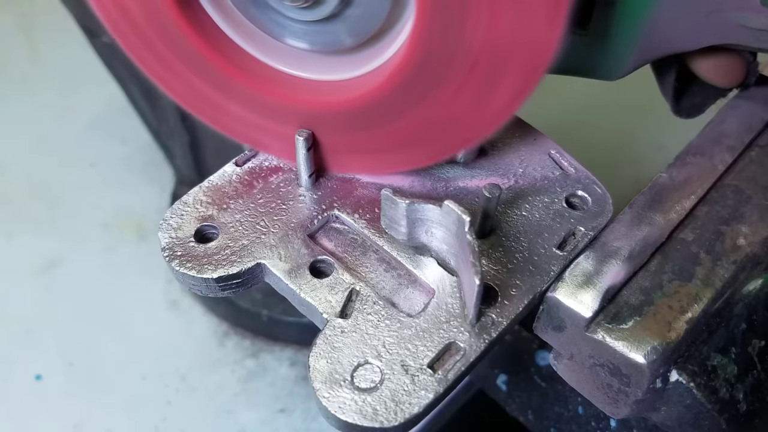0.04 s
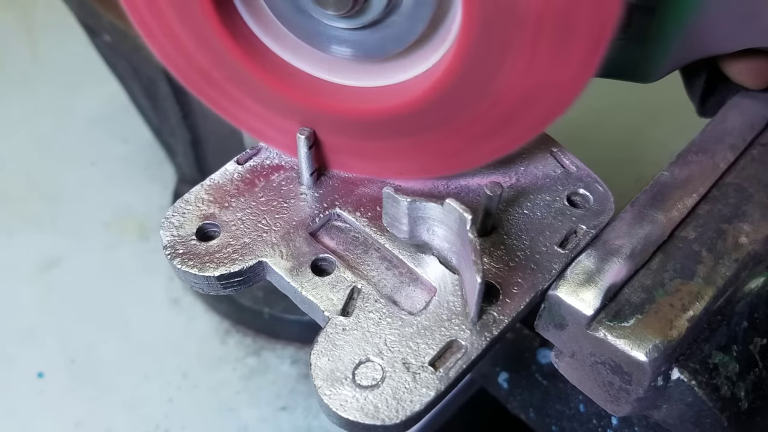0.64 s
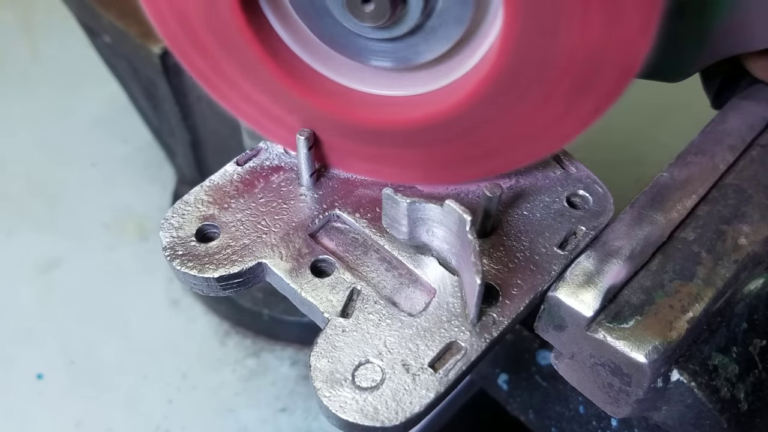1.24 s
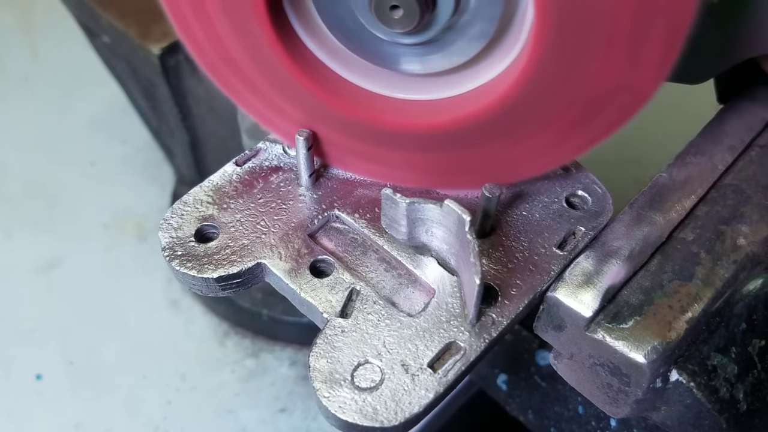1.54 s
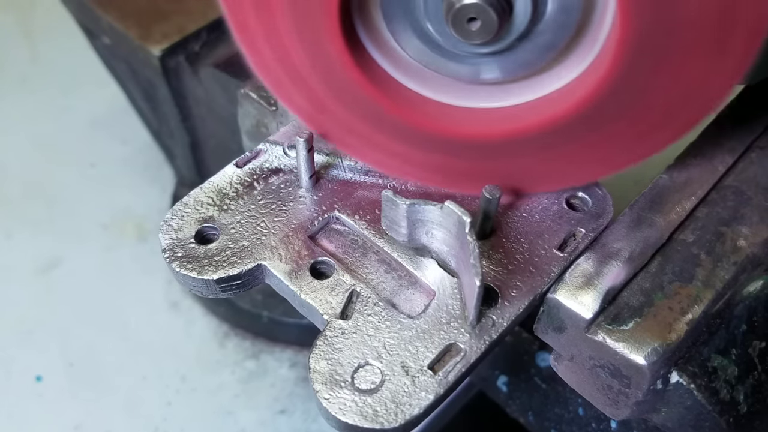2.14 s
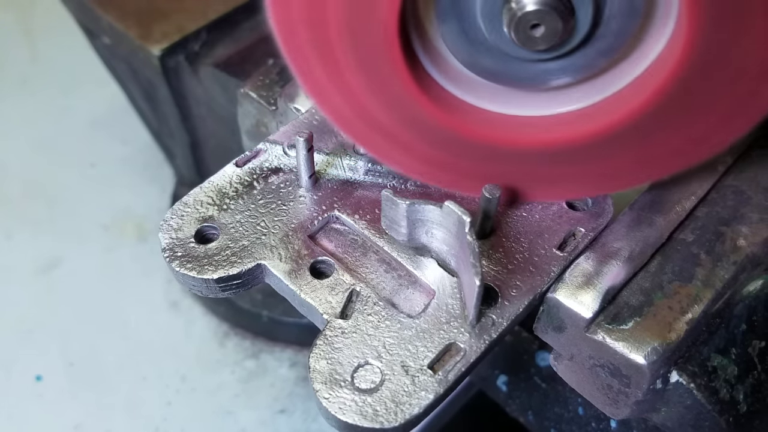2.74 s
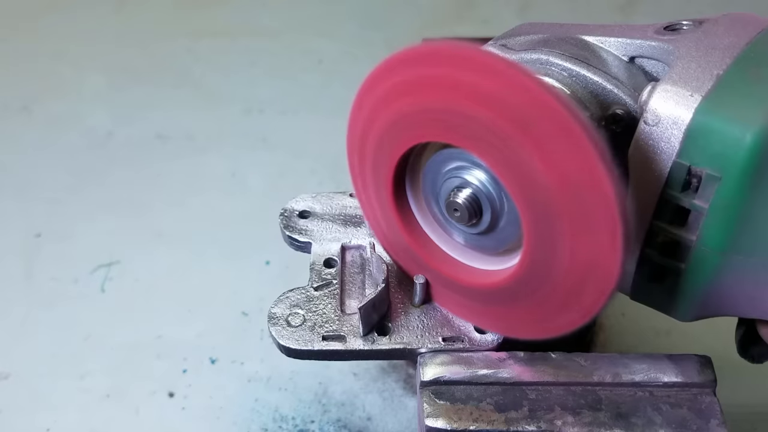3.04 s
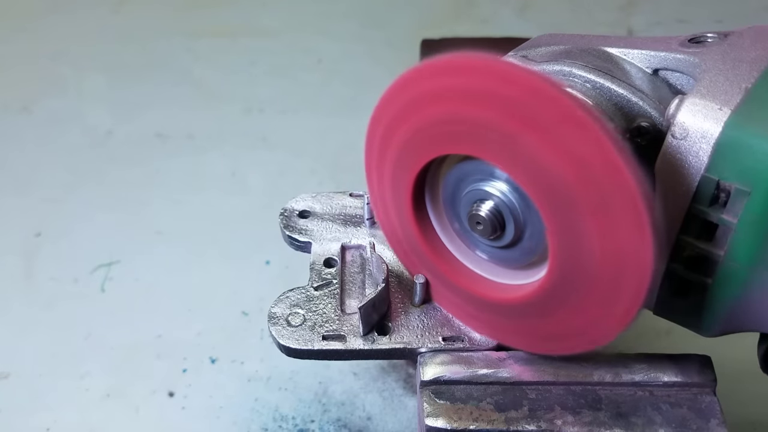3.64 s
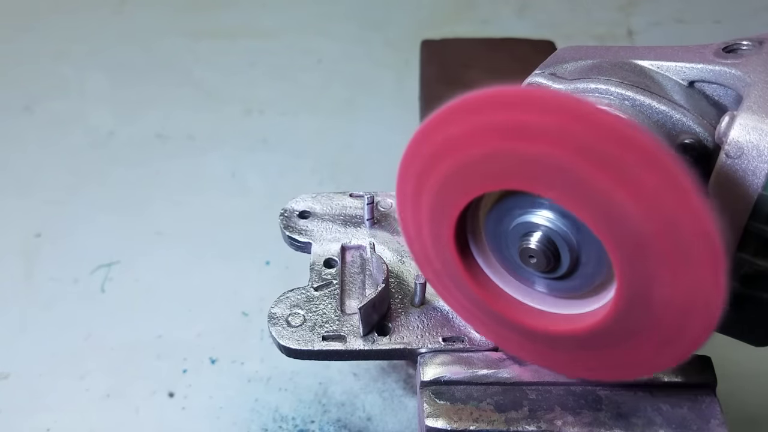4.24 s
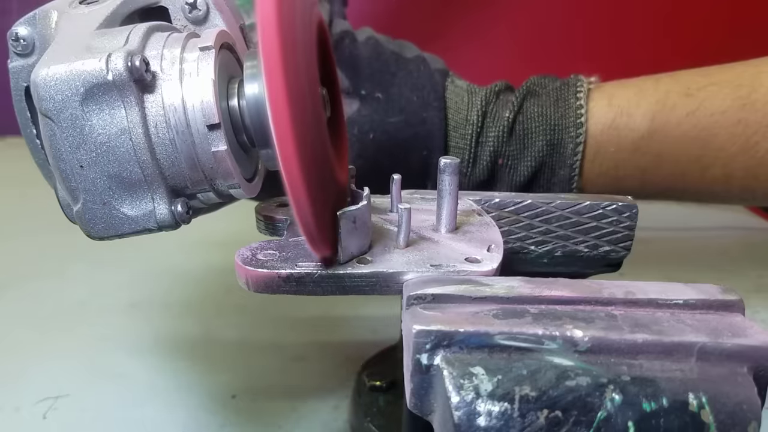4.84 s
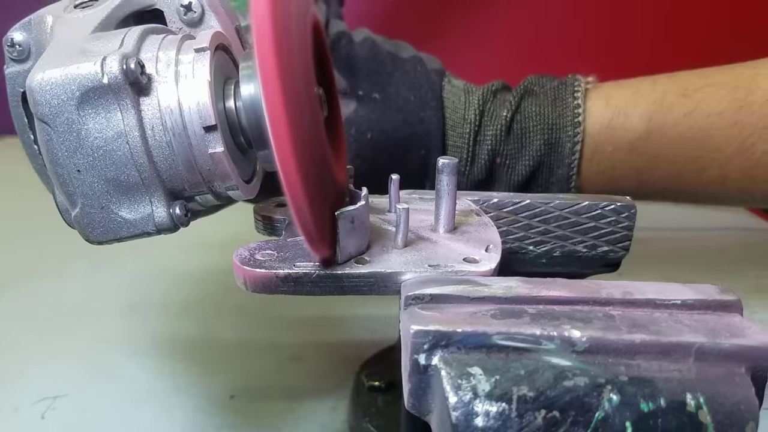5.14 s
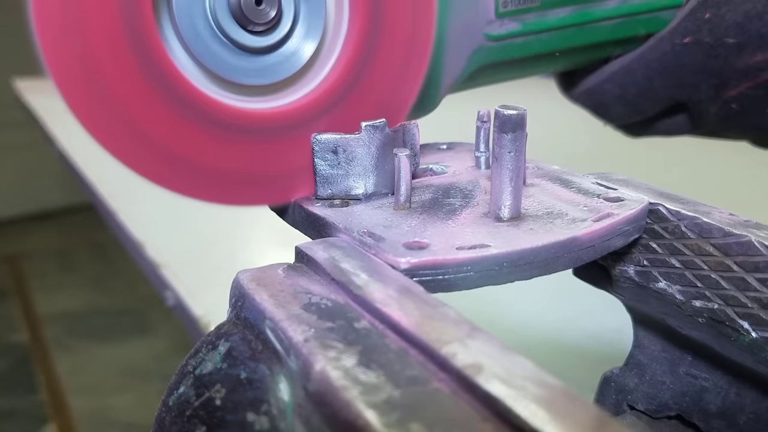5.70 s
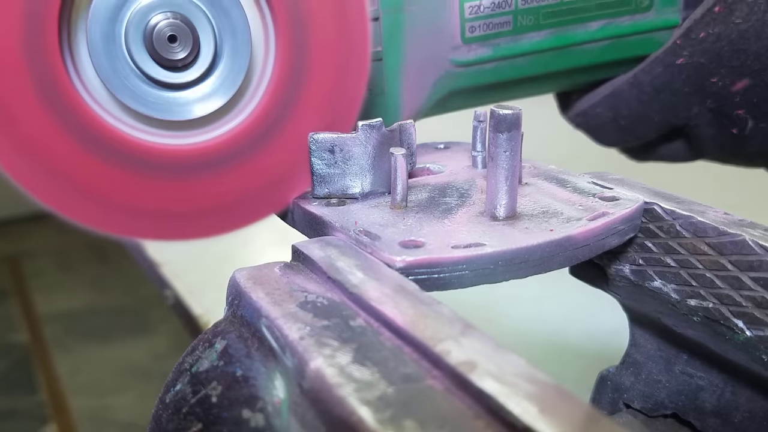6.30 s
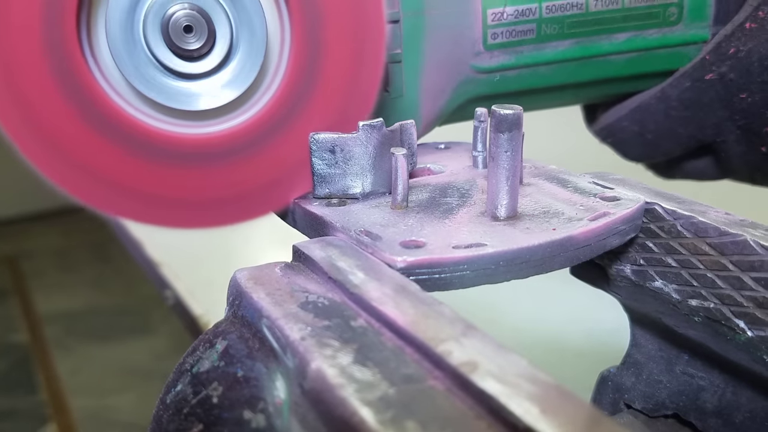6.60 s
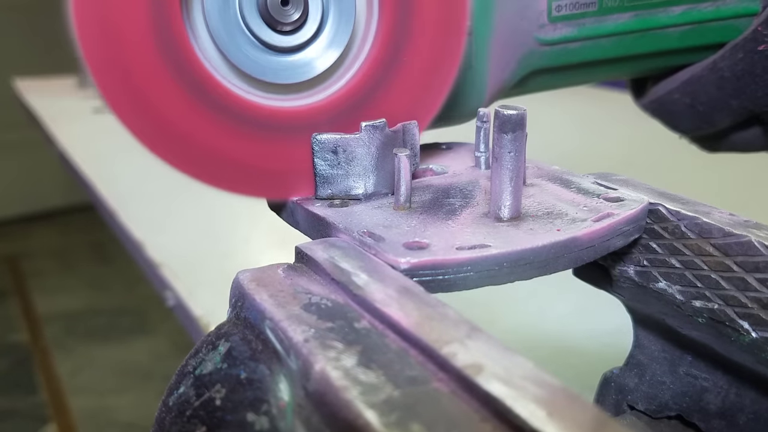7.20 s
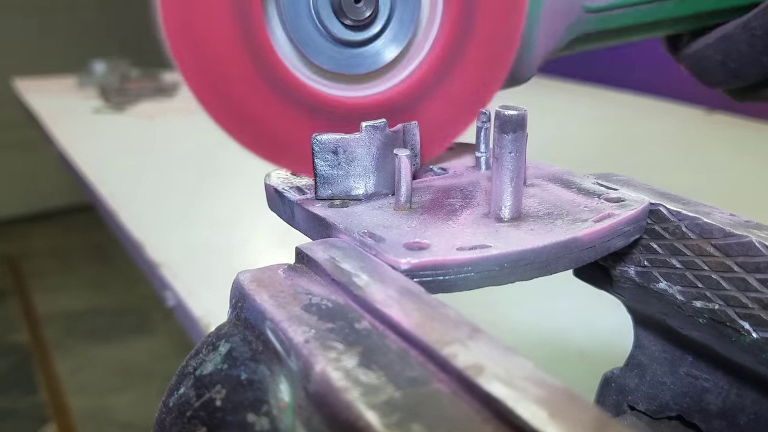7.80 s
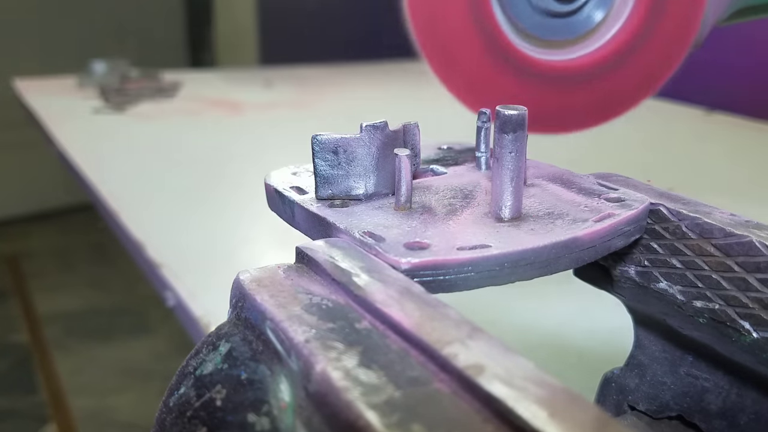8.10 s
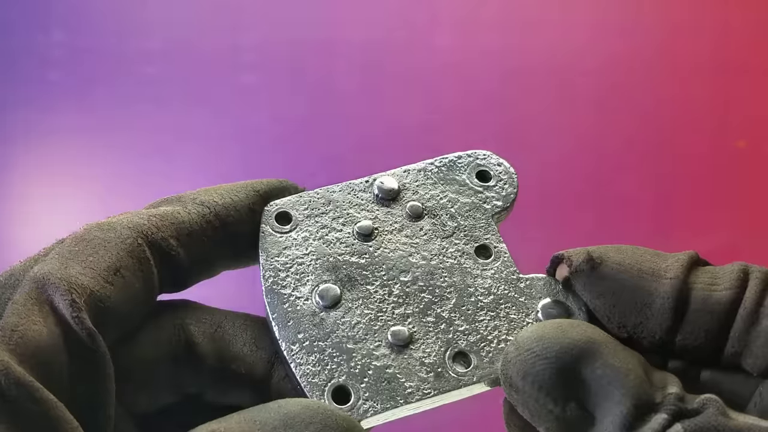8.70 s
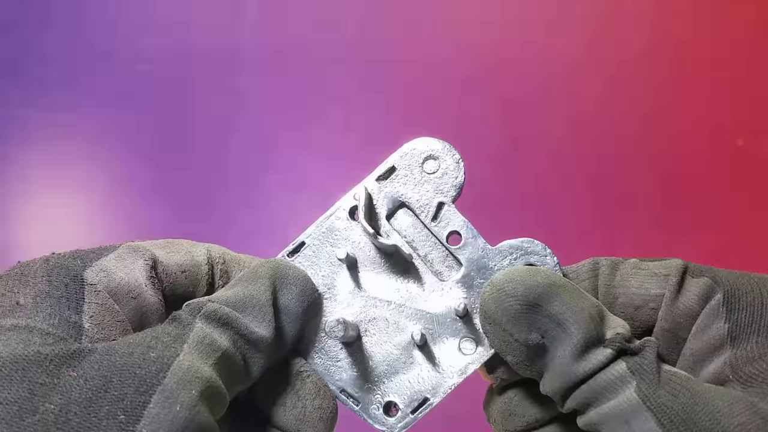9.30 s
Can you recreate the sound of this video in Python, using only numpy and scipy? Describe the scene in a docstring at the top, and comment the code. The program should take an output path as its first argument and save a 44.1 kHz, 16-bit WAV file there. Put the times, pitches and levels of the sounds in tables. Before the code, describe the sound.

Close to a workbench, a polishing wheel on an angle grinder hisses continuously against steel, its motor whining underneath. The tone shifts abruptly a few times, and the wheel's draught rumbles on the microphone. In the second half, high whistles and singing metal notes come through as the motor slows slightly. After one harsher rasp the sound fades to silence, then a soft, dull rush starts at the very end.

```python
"""An angle grinder drives a felt wheel over a steel plate in a vice, heard close from four places in turn. From
the start the wheel rubs with the same texture every turn and rings the plate, while rotor, gears and spindle
hum, slowing under load, and the wheel's draught buffets the microphones. After five seconds the rub squeals and
the plate sings. Near eight a last hard pass rasps and the wheel lifts off, the rub dying away; then the whole
sound fades to silence, and out of the silence a dull rush starts at the very end."""
import sys
import numpy as np
from scipy import signal
from scipy.fft import rfft, irfft, next_fast_len
from scipy.io import wavfile
from scipy.ndimage import uniform_filter1d, map_coordinates

SR = 44100
rng = np.random.default_rng(int(sys.argv[2]) if len(sys.argv) > 2 else 0)


def unload_wav(signal):
    """Save mono or channel-first audio to the path in sys.argv[1] as 16-bit WAV at rate SR, clipped to [-1, 1]."""
    wavfile.write(
        sys.argv[1],
        SR,
        np.round(np.clip(np.atleast_2d(signal).T, -1, 1) * 32767).astype(np.int16),
    )


N = 412335
TIME = np.arange(N) / SR
GEAR = 13 / 48  # pinion teeth over crown teeth
FADE_S, SILENT_S = 8.52, 8.68  # everything fades to silence between these times
# Tone of the hiss from above, in front, side on, low by the vice, and in the hard pass.
# Each row: frequency in Hz, left gain in dB, right gain in dB.
ABOVE = [(298, -91, -86.5), (529, -85, -82), (760, -86, -79), (1210, -74.5, -74), (1460, -76.5, -76.5),
         (1764, -76.5, -72.5), (2320, -78.5, -75.5), (2540, -77, -73), (4080, -76.5, -74), (5730, -84, -78),
         (7860, -83, -80), (9100, -91.5, -93.5), (12900, -85, -88), (15500, -86.5, -83.5)]
FRONT = [(300, -89, -91), (420, -89, -85.5), (1050, -83.5, -80), (1320, -78, -77), (2400, -83.5, -78.5),
         (2530, -79, -76), (4100, -80.5, -78), (4540, -83.5, -77.5), (5800, -83, -81.5), (7300, -88.5, -79),
         (8200, -81, -82.5), (9430, -101.5, -99), (9930, -87, -92.5), (15500, -84, -84)]
SIDE_ON = [(300, -89.5, -91.5), (600, -84, -85), (766, -85, -84.5), (875, -80.5, -81.5), (2070, -80.5, -78),
           (2530, -74.5, -79.5), (2780, -76.5, -77.5), (6100, -80.5, -80), (7100, -87, -80.5),
           (8000, -81, -83.5), (9450, -88, -99.1), (10600, -81, -98.6), (10750, -81.5, -95),
           (15500, -83.5, -90)]
LOW = [(299, -89.5, -88.5), (503, -86.5, -83.5), (600, -84.5, -83), (810, -85.5, -80.5), (1160, -76.5, -78),
       (1430, -77.5, -74.5), (2190, -77, -76), (2940, -76, -77.5), (4100, -77.5, -74.5), (6800, -82, -81.5),
       (8550, -82.5, -81), (9450, -86, -96.5), (11600, -82.5, -90.5), (15500, -83.5, -84)]
RASP = [(296, -85, -82.5), (600, -76.5, -71.5), (776, -81, -74.5), (1205, -74.5, -73), (1650, -77, -70),
        (2070, -70, -71.5), (2393, -73, -69), (2960, -72.5, -70), (3770, -72, -67), (4100, -69.5, -69),
        (7720, -78.5, -72.5), (9450, -82, -87), (12570, -78.5, -79.5), (15400, -79, -78)]


def felt_rim(turns, memory=0.92, points=256):
    """Felt on steel along three sound paths: the rim's texture comes round every turn and slowly wears."""
    fresh = rng.standard_normal((3, 1700, points))  # path, turn, point on the rim
    worn = signal.lfilter([1], [1, -memory], fresh, axis=1)
    paths = worn[:, 40:].reshape(3, -1)  # start once the texture has built up
    return unit(np.array([map_coordinates(path, [turns * points], order=3) for path in paths]))


def friction(turns, load, band_hz=(6800, 13300), off_band_repeat=0.13, wobble=0.05, flutter_db=0.6):
    """The repeating rub, clearest in one treble band and under load, mixed with fresh air noise."""
    rub, air = felt_rim(turns), rng.standard_normal((3, N))
    blend = lambda share: np.sqrt(share) * rub + np.sqrt(1 - share) * air
    repeating = np.zeros(N)
    for part, _, _, repeat, *_ in perspectives():
        repeating[part] = repeat * np.sqrt(load[part])
    body = blend(repeating * off_band_repeat)
    sizzle = highpass(blend(repeating) - body, band_hz[0])
    felt = body + sizzle - highpass(sizzle, band_hz[1])
    throb = 1 + wobble * np.sin(2 * np.pi * turns)  # the out-of-round wheel presses harder once a turn
    return felt * throb * undb(flutter_db * walk(35))


def perspectives():
    """Where the rub is heard from: each stretch's slice of samples, followed by its settings."""
    # Each row: start in seconds, left microphone's lag in ms, direct share, share that repeats at full
    # load, treble in dB, left minus right in dB, its drift in dB per second, tone.
    views = [(0, -0.013, 0.45, 0.31, 2.5, 2, -0.3, ABOVE), (3.0, 0.048, 0.38, 0.5, -0.5, -0.8, 0.9, FRONT),
             (4.57, -0.18, 0.56, 0.37, 2, -0.5, -1, SIDE_ON), (5.265, -0.11, 0.39, 0.5, 1.7, 0, 0.16, LOW),
             (7.829, 0.061, 0.25, 0, 1.3, 2, -9, RASP)]
    ends = [row[0] for row in views[1:]] + [SILENT_S]
    return [(span(start, end), *settings) for (start, *settings), end in zip(views, ends)]


def hiss(rub, diffuse_hz=6000, echo_s=0.001103, bend_rad=0.43, brighten=0.2, trim_db=-0.63):
    """The rub reaches the microphones directly and scattered; a lighter touch is quieter and brighter."""
    # How hard the wheel rubs. Each row: time in seconds, pressure in dB.
    pressure = [(0, 0.1), (1.0, 1.5), (2.1, -1.3), (2.98, -2.5), (3.02, 1), (4.15, 0.5), (4.65, -0.7),
                (5.45, 2.5), (6.05, 1), (6.6, 1.5), (6.95, -0.1), (7.5, 1.55), (7.81, 0.7), (7.835, -1.5),
                (8.14, -3), (8.24, 1.6)]
    pressure_db = curve(pressure) - 0.1 * walk(9.1) + lift_db()  # the hand is slightly unsteady
    out = np.zeros((2, N))
    for part, lag_ms, direct, _, treble_db, first_pan_db, drift_db_per_s, tone in perspectives():
        share = lambda hz: direct / (1 + (hz / diffuse_hz) ** 2)  # treble arrives mostly scattered
        delay = lambda hz: np.exp(-2j * np.pi * hz * np.array([[lag_ms / 1000], [0]]))
        # the echo off the bench bends the phase between the microphones
        echo = lambda hz: np.exp(1j * bend_rad * np.sin(2 * np.pi * hz * echo_s) * np.array([[1], [0]]))
        straight = shape(rub[0, part], lambda hz: np.sqrt(share(hz)) * delay(hz) * echo(hz))
        scattered = shape(rub[1:, part], lambda hz: np.sqrt(1 - share(hz)))
        pair = highpass(colour(straight + scattered, tone), 210) * np.sqrt(SR / 2)
        treble = undb(treble_db - brighten * pressure_db[part])
        pair += (treble - 1) * highpass(pair, 6900)
        pan_db = first_pan_db + drift_db_per_s * (TIME[part] - TIME[part.start])
        out[:, part] = pair * undb(trim_db + pressure_db[part] + np.array([pan_db, -pan_db]) / 2)
    return out


def lift_db(lift_s=8.179, db_per_s=35.5):
    """The rubbing dies away once the wheel comes off the plate."""
    return -db_per_s * np.maximum(TIME - lift_s, 0)


def plate_rings(rub):
    """Each resonance of the plate swells and glides as the wheel crosses the spot that wakes it."""
    # Each row: start, end and ramp in seconds, pitch midway in Hz, glide in Hz per second,
    # width in Hz, level in dB.
    resonances = [(0, 2.95, .1, 1220, -31.5, 200, -79), (0, 1.9, .15, 2870, 0, 200, -66),
                  (1.85, 2.95, .3, 4030, 0, 700, -57), (3.0, 4.55, .1, 3280, 0, 140, -73),
                  (4.57, 5.26, 0.055, 1114, 0.5, 70, -70), (4.57, 5.26, .05, 1660, 2, 95.4, -71),
                  (4.57, 5.26, .05, 3480, 0, 180, -63), (4.52, 4.95, .12, 13660, -1200, 500, -55),
                  (5.25, 5.65, .12, 7670, -300, 220, -59), (5.27, 6.9, 0.13, 1127, 0.5, 149, -66),
                  (5.27, 6.9, 0.14, 4370, 0, 500, -75), (5.25, 5.7, .1, 13550, -200, 600, -58),
                  (5.45, 6.1, .25, 14350, -300, 1500, -50), (5.9, 6.95, .2, 11600, 699, 1900, -56),
                  (6.3, 6.9, .15, 1610, 0, 70, -67), (7.0, 7.7, .15, 1490, 0, 160, -65),
                  (7.0, 7.8, .1, 3700, 0, 1500, -57.5), (7.4, 7.65, .1, 7990, 199, 400, -55),
                  (7.7, 7.83, .03, 7900, 0, 250, -61), (7.82, 8.68, 0.017, 1590, -0.5, 240, -48.5),
                  (7.82, 8.68, 0.017, 1070, 1, 110, -58), (7.82, 8.05, .02, 2820, 0, 260, -48),
                  (7.82, 7.99, .015, 4600, 0, 1600, -49.5), (7.82, 8.02, .015, 1450, -0.5, 900, -54),
                  (7.85, 8.68, .3, 7270, 1.5, 500, -54.5), (7.98, 8.68, 0.089, 2460, -300, 520, -48),
                  (8.0, 8.68, .08, 3300, -300, 750, -51.5), (8.04, 8.15, .03, 3300, 0, 1000, -50)]
    out = np.zeros((2, N))
    for start, end, ramp, centre, glide, width, db in resonances:
        part = span(start, end)
        pitch_hz = centre + glide * (TIME[part] - (start + end) / 2)
        phase = 2 * np.pi * np.cumsum(pitch_hz) / SR
        drive = rub[0, part] + rub[1:, part]
        # a moving band-pass: shift the centre down to zero, smooth, shift it back
        smooth = lambda hz: 1 / (1 + (2 * hz / width) ** 2)
        ring = sum(wave * shape(drive * wave, smooth) for wave in (np.cos(phase), np.sin(phase)))
        right_db = -8 if centre > 9000 else 0  # the left microphone hears the highest rings best
        out[:, part] += unit(ring) * undb([[db], [db + right_db]]) * window(start, end, ramp)[part]
    return out * undb(lift_db())


def cancel_bands(sound, ramp_s=0.093):
    """Scoop out bands that cancel where the microphones stand, each for a while."""
    # Each row: start and end in seconds, centre and width in Hz, depth in dB.
    hollows = [(3.0, 4.6, 4330, 220, 2), (5.195, 7.848, 2340, 300, 3.5), (5.2, 7.8, 4850, 260, 1),
               (5.9, 7.0, 3150, 700, 2), (6.9, 7.85, 5950, 220, 2.5), (6.1, 7.85, 8600, 503, 5),
               (7.8, 8.6, 2170, 259.5, 3)]
    out = sound.copy()
    for start, end, centre, width, depth_db in hollows:
        part = span(start, end)
        band = shape(out[:, part], lambda hz: np.exp(-(2 * (hz - centre) / width) ** 2 / 2))
        out[:, part] -= (1 - undb(-depth_db)) * window(start, end, ramp_s)[part] * band
    return out


def plate_notes(ramp_s=0.16, waver_hz=3, waver_db=1.2):
    """The plate sings a nearly pure, slightly unsteady note where the wheel bears on its edge."""
    # Each row: start and end in seconds, pitch in Hz, level in dB.
    notes = [(6.32, 6.82, 1607, -52.5), (7.08, 7.53, 1471, -53.5)]
    drift_hz, waver = waver_hz * walk(45), undb(waver_db * walk(20))
    out = np.zeros(N)
    for start, end, hz, db in notes:
        phase = 2 * np.pi * np.cumsum(hz + drift_hz) / SR
        out += window(start, end, ramp_s) * undb(db) * np.sin(phase)
    return np.sqrt(2) * waver * out


def squeals(turns, ramp_s=0.049, flicker_db=2.2, slip_turns=0.0011):
    """Thin whistles where a multiple of the wheel's speed meets a resonance; they throb once a turn."""
    # Each row: start and end in seconds, multiple of the wheel's speed, left level in dB,
    # depth of the throb, right minus left in dB.
    whistles = [(5.26, 5.6, 43, -60, .3, 4), (5.36, 5.76, 70, -57, 1.1, -7), (5.43, 5.68, 78, -57, .7, -10),
                (5.56, 5.85, 85, -56, .7, -6), (5.73, 5.98, 82, -56, 1.0, -5),
                (5.76, 6.16, 86, -58, .3, -8), (5.96, 6.24, 67, -53.5, .9, -20),
                (5.97, 6.24, 65, -57.5, .2, -18), (5.96, 6.45, 49, -57, .5, -3),
                (6.04, 6.66, 71, -53.5, 1.3, -17), (6.1, 6.65, 83, -58.5, .7, -10),
                (6.2, 6.75, 87, -59, .9, -10), (6.22, 6.68, 77, -55.5, .6, -13),
                (6.58, 6.95, 72, -58.5, .6, -17), (7.0, 7.32, 48, -56, .3, 0),
                (7.05, 7.26, 66, -56.5, .2, -20), (7.2, 7.44, 49, -60, 1.1, 0),
                (7.32, 7.54, 66, -54.5, .7, -20), (7.39, 7.65, 49, -48.5, 1.0, -2.5),
                (7.42, 7.58, 47, -57.5, .2, 4)]
    flicker = undb(flicker_db * walk(30))
    slipped = turns + slip_turns * walk(70)  # the felt slips back and forth
    out = np.zeros((2, N))
    for start, end, multiple, db, throb, right_db in whistles:
        part = span(start, end)
        cycles = multiple * slipped[part] + rng.random()
        whistle = np.sin(2 * np.pi * (cycles + np.array([[0], [1 / 4]])))  # right is a quarter cycle on
        grip = 1 + throb * np.sin(2 * np.pi * (turns[part] + rng.random()))
        envelope = (window(start, end, ramp_s) * flicker)[part] * grip
        out[:, part] += envelope * undb([[db], [db + right_db]]) * whistle
    return np.sqrt(2) * out


def motor(rotor_turns, jitter_turns=0.054, whine_ramp_s=0.058):
    """Spindle and rotor hum at their own speeds; fan, gears and commutator whine at rotor multiples."""
    # Swells of the two unbalance hums. Each row: start and end in seconds, level in dB.
    spindle_swells = [(0, .6, -66), (4.74, 5.26, -67.5), (6.088, 6.497, -67.5), (7.039, 7.64, -65.5),
                      (7.902, 8.276, -69.5)]
    rotor_swells = [(0.452, .95, -63.5), (4.1, 4.547, -62.5), (5.38, 5.92, -57), (6.28, 6.615, -61),
                    (6.998, 7.703, -63), (7.764, 8.047, -55.5), (8.203, 8.682, -60.5)]
    # Each row: start and end in seconds, multiple of the rotor's speed, level in dB.
    whines = [(0, 5.26, 4, -73), (0, 8.7, 5, -65.5), (0, 8.6, 6, -72.5), (5.27, 8.6, 9, -69.5),
              (7.0, 7.8, 13, -67), (0, 5.26, 24, -72)]
    waver_db = 1.4 * walk(22)
    # the tones reach the two microphones a little out of step
    phase = 2 * np.pi * (rotor_turns + jitter_turns * walk(30) + np.array([[0], [.12]]))
    spindle_gain = swelling(spindle_swells, steady_db=-78) * undb(0.9 * walk(14))
    rotor_gain = swelling(rotor_swells, steady_db=-68.5) * undb([waver_db - 1, waver_db])
    tones = spindle_gain * np.sin(GEAR * phase) + rotor_gain * np.sin(phase)
    for start, end, multiple, db in whines:
        tones += window(start, end, whine_ramp_s) * undb(db + waver_db) * np.sin(multiple * phase)
    return np.sqrt(2) * tones


def draught(eddy_db=2.7, breeze_db=-66.5, strong_db=-38, bright=.55, ramp_s=0.096, trim_db=-1.5):
    """Eddies thump each microphone on its own; a strong draught breaks into smaller, brighter ones."""
    # Tone of the buffeting. Each row: frequency in Hz, gain in dB.
    buffet = [(20, -31.5), (40, -17), (75, 0), (125, 1), (190, -1.5), (280, -9), (400, -14.5), (600, -23.5),
              (1200, -44.5), (4000, -89)]
    # The wheel's air jet sweeps over a microphone. Each row: start and end in seconds,
    # strength midway in dB, growth in dB per second, microphone.
    gusts = [(-.05, 0.66, -59, -15, "left"), (0.635, 1.455, -50.5, -1, "left"),
             (.66, 1.47, -60.5, 16, "right"), (1.48, 2.98, -52.5, -10, "left"),
             (1.5, 3.06, -42.5, 6.5, "right"), (2.973, 3.536, -37.5, -2, "left"),
             (3.462, 4.06, -41.5, -10, "left"), (3.973, 4.29, -41.5, -12, "left"),
             (4.197, 4.616, -49.5, 2, "left"), (4.248, 4.625, -52.5, 15, "right"),
             (5.58, 5.965, -57.5, 5, "right"), (7.78, 8.402, -65, -3, "left"),
             (7.765, 8.503, -57.5, -9, "right")]
    eddies = np.array([rng.standard_normal(N) * undb(eddy_db * walk(140)) for _ in range(2)])
    thumps = colour(eddies, buffet)
    thumps /= np.sqrt(uniform_filter1d(thumps ** 2, int(.1 * SR)))  # even out the level over 0.1 s
    jet = np.zeros((2, N))
    for start, end, db, growth_db_per_s, microphone in gusts:
        gust_db = db + growth_db_per_s * (TIME - (start + end) / 2)
        jet[["left", "right"].index(microphone)] += window(start, end, ramp_s) * undb(gust_db)
    flow = np.hypot(jet, undb(breeze_db))
    small_eddies = bright * flow / undb(strong_db) * highpass(thumps, 230)
    return (thumps + small_eddies) * flow * undb(trim_db)


def bench(level_db=-75, top_hz=70):
    """The workbench rumbles faintly while the tool bears on it."""
    noise = highpass(rng.standard_normal((2, N)), 22)
    rumble = shape(noise, lambda hz: 1 / (1 + (hz / top_hz) ** 2))
    return unit(rumble) * undb(level_db + lift_db())


def rush(start_s=9.322, rise_s=0.022, level_db=-50):
    """A dull noise swells out of the silence."""
    # Each row: frequency in Hz, gain in dB.
    tone = [(30, -17), (150, -7), (380, 1.5), (900, -5), (2200, -11), (4000, -22), (8000, -33),
            (15000, -61)]
    noise = unit(colour(rng.standard_normal((2, N)), tone))
    return noise * undb(level_db) * np.clip((TIME - start_s) / rise_s, 0, 1)


def swelling(swells, steady_db, ramp_s=0.12):
    """A steady gain with swells that rise, hold and fall on top of it."""
    power = sum((undb(db) * window(start, end, ramp_s)) ** 2 for start, end, db in swells)
    return np.sqrt(undb(steady_db) ** 2 + power)


def undb(db):
    """Decibels to gain."""
    return 10 ** (np.asarray(db) / 20)


def unit(x):
    """Scale to rms 1."""
    return x / np.sqrt(np.mean(x ** 2, axis=-1, keepdims=True))


def curve(points):
    """Join (seconds, value) points with straight lines."""
    return np.interp(TIME, *np.transpose(points))


def walk(rate):
    """A random drift of rms 1 that heads for a new value rate times a second."""
    steps = np.arange(int(rate * N / SR) + 2)
    return unit(np.interp(TIME * rate, steps, rng.standard_normal(len(steps))))


def span(start, end):
    """The samples between two times."""
    return slice(int(start * SR), int(end * SR))


def window(start, end, ramp):
    """1 between two times, with straight ramps just inside them."""
    return np.clip(np.minimum(TIME - start, end - TIME) / ramp, 0, 1)


def shape(x, gain):
    """Filter by a gain that is a function of frequency."""
    size = next_fast_len(x.shape[-1], True)
    hz = np.maximum(np.arange(size // 2 + 1) * SR / size, 1)
    return irfft(rfft(x, size) * gain(hz), size)[..., :x.shape[-1]]


def colour(x, table):
    """Equalise by (Hz, dB) points, with one dB column for both channels or one for each."""
    points, *columns = np.transpose(table)
    return shape(x, lambda hz: undb([np.interp(np.log(hz), np.log(points), db) for db in columns]))


def highpass(x, edge_hz):
    """A steep, smooth low cut."""
    return shape(x, lambda hz: 1 / (1 + (edge_hz / hz) ** 6))


def scene(free_hz=720, full_sag_hz=80):
    """One rotor speed drives the motor's tones and, through the gears, the wheel; its sag is the load."""
    # The rotor slows as the wheel is pressed on. Each row: time in seconds, turns per second.
    rotor_speed = [(0, 661), (.5, 653), (1.2, 649), (2.95, 641), (3.3, 650), (3.8, 643), (4.15, 632),
                   (4.5, 634), (4.75, 627), (5.0, 625), (5.25, 630), (5.28, 664), (5.42, 660), (5.6, 652),
                   (5.8, 637.6), (6.05, 614.8), (6.2, 605.4), (6.42, 597), (6.68, 589), (6.88, 593),
                   (7.05, 602.6), (7.45, 603.6), (7.73, 614), (7.93, 597), (8.08, 627), (8.3, 655),
                   (8.6, 674)]
    rotor_hz = curve(rotor_speed)
    load = np.maximum(free_hz - rotor_hz, 0) / full_sag_hz
    rotor_turns = np.cumsum(rotor_hz * (1 + 0.000295 * walk(8))) / SR
    wheel_turns = GEAR * rotor_turns
    rub = friction(wheel_turns, load)
    steel = cancel_bands(hiss(rub) + plate_rings(rub)) + plate_notes()
    grinder = steel + motor(rotor_turns) + draught() + bench() + squeals(wheel_turns)
    fade = np.clip((SILENT_S - TIME) / (SILENT_S - FADE_S), 0, 1) ** 1.2
    return fade * grinder + rush()


def record(dry, top_hz=15700):
    """A steep low-pass takes off the very top."""
    return signal.sosfilt(signal.ellip(12, .1, 80, top_hz, fs=SR, output="sos"), dry)


dry = scene()
out = record(dry)
unload_wav(out)
```